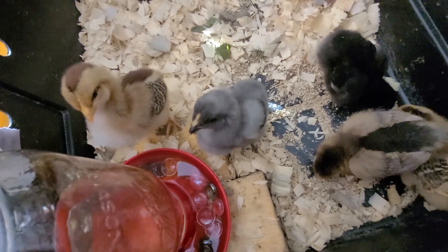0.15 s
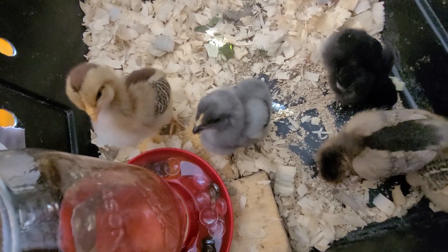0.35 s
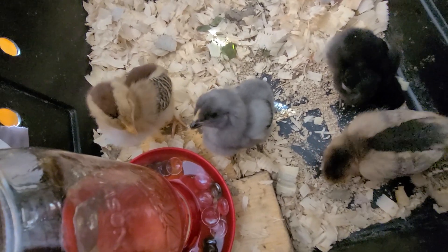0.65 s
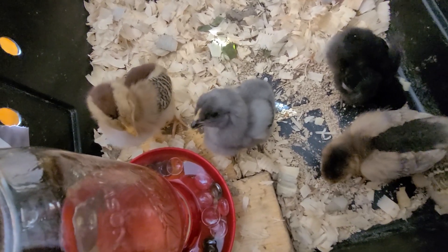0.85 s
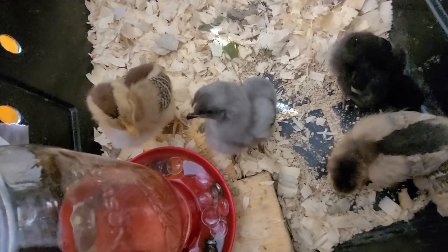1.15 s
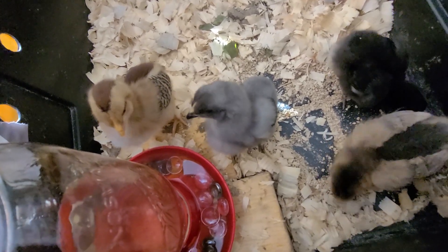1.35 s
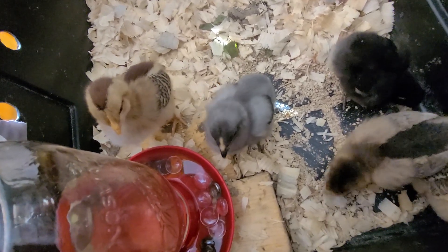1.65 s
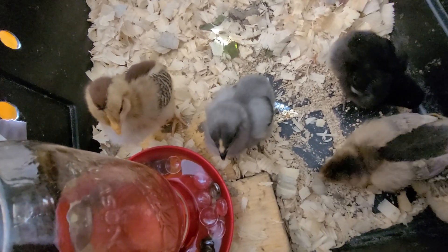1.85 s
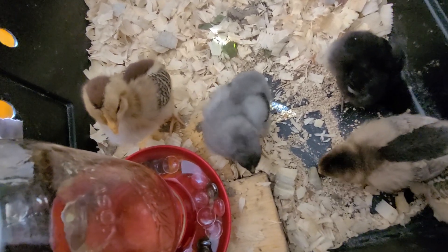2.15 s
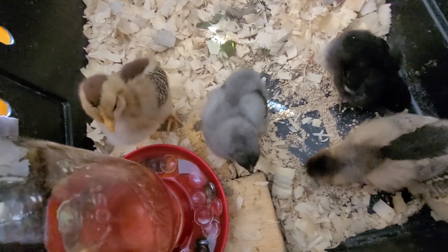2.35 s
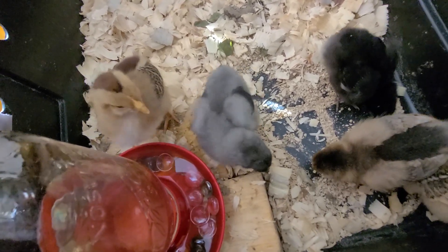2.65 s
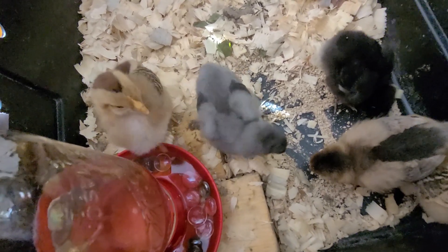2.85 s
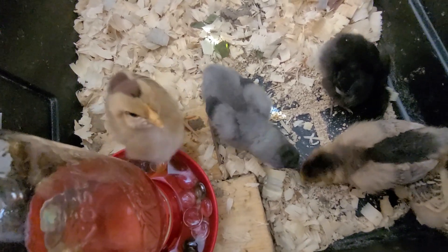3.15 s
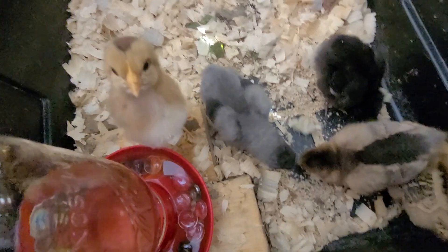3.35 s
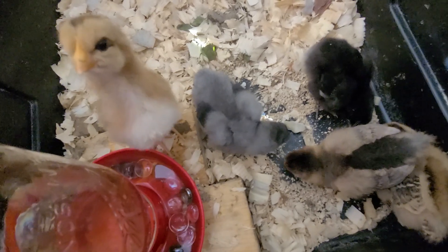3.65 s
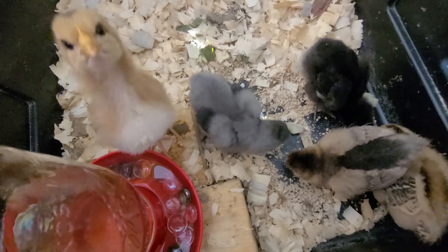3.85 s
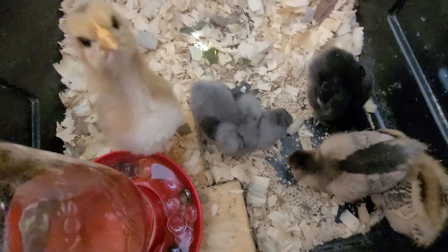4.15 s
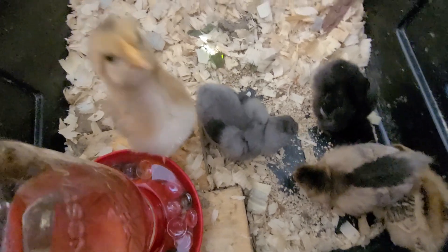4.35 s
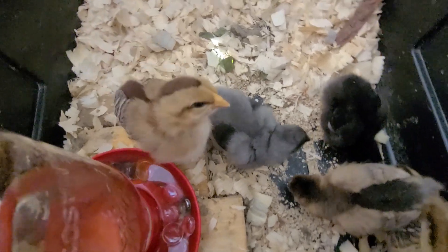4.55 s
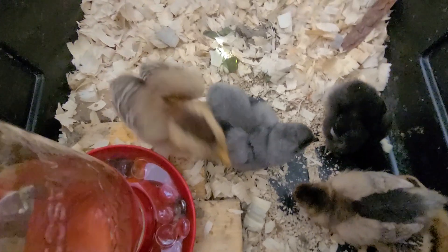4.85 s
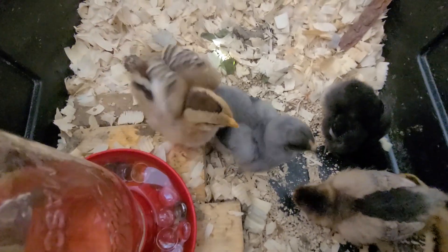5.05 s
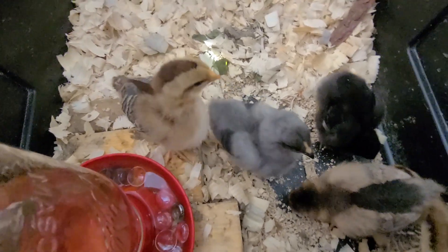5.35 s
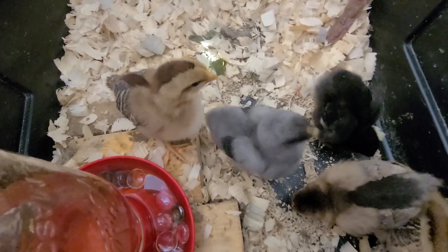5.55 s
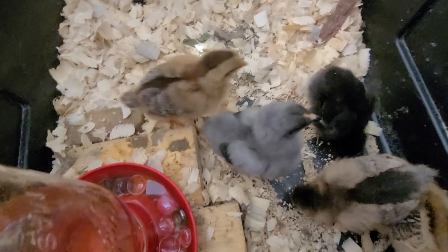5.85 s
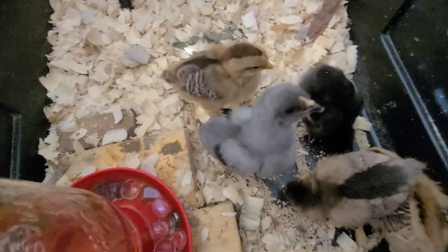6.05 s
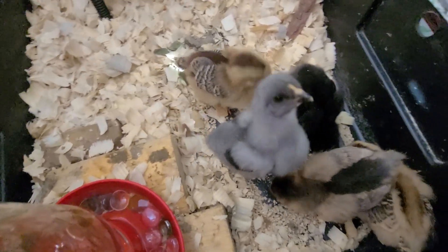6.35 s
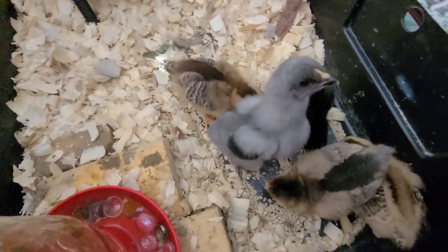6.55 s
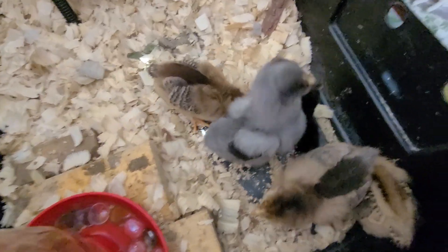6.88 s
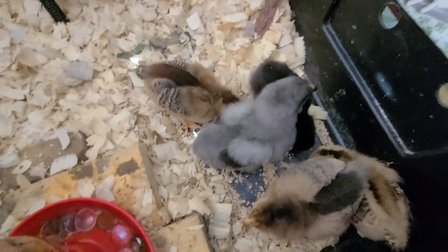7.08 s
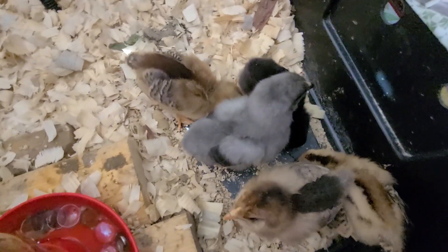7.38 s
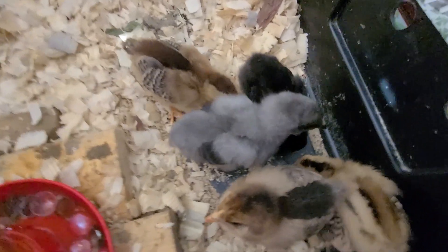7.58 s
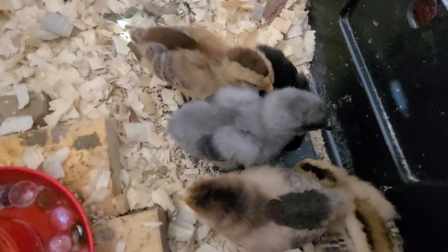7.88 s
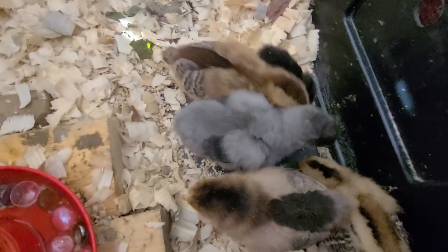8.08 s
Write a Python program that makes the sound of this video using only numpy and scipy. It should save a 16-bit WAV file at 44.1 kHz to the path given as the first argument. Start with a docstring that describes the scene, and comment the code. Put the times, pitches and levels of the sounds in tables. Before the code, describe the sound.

Chicks peep and peck close by in a plastic bin, over a faint room hum. From the start, beaks tap unevenly on the floor with a short, slightly hollow ring, one knock standing out at 1 second. Short, high, rising peeps are scattered through the first 3 seconds. Dry wood shavings rustle and snap underfoot, busiest from 2.5 to 3.5 seconds, with soft low thuds of steps. Three quick falling peeps come around 3.5 seconds, then a few rising ones and sharper knocks near 3.9 and 4.3 seconds. A rustle and soft thud follow at 5 seconds, and the peeps grow sparse and faint. A strong knock lands at 6.3 seconds amid more scratching. From 7 to 8 seconds comes a run of the loudest pecks, with three higher, stronger rising peeps and a softer one just after.

```python
"""Chicks peep and peck for food in a plastic bin indoors.
Each peep is a short whistle from the bird's voice organ, the syrinx, sweeping up or sliding down.
Beaks knock on the bin floor, make it ring and toss crumbs; heavy steps thud through the bin.
Feet, wings and pecks rustle and snap the wood shavings. Behind it all, the room hums faintly."""
import sys
import numpy as np
from scipy import signal
from scipy.fft import rfft, irfft
from scipy.io import wavfile

SR = 44100
rng = np.random.default_rng(int(sys.argv[2]) if len(sys.argv) > 2 else 0)


def output_pcm(signal):
    """Save a mono or channel-first signal as 16-bit PCM at the path in sys.argv[1].

    Samples are clipped to [-1, 1] before scaling.
    """
    pcm = np.clip(np.atleast_2d(signal).T, -1, 1) * 32767
    wavfile.write(sys.argv[1], SR, np.round(pcm).astype(np.int16))


N = 362502

# Beak blows on the floor: start_s, level_db, hardness_db_per_octave, crack_db, hollow_ring_db
PECKS = [(0.0505, -25.5, 6.5, -41.5, 12.5), (0.0942, -19, 7, -39.5, 4), (0.3725, -18.5, 7.5, -46, -2.5),
         (0.515, -20, 22.5, -39, 5), (0.6141, -14, 7, -39.5, 0), (0.9857, -9, 5, -50, 0),
         (1.1675, -22, 5.5, -31.5, 11), (1.6191, -22, 1.5, -55, 15), (1.634, -20.5, 5, -40.5, 8.5),
         (1.8561, -24, -0.5, -37, 7.5), (2.0754, -23, 7, -38.5, -4), (2.284, -35, 23, -60, 10),
         (2.416, -24.5, 9, -56, 9), (2.4603, -23, -0.5, -48, 3), (2.4904, -20.5, 12, -31.5, -5),
         (3.146, -32.5, 20, -52, -2), (3.2455, -21.5, 1.5, -38, 3.5), (3.875, -9, 3.5, -38.5, -7.5),
         (4.2815, -14, 4.5, -40.5, -14), (4.539, -31, 34, -34, -6), (4.6966, -38.5, 18, -62, 11),
         (4.7749, -40, 10, -46.5, 4), (5.566, -29, -7, -38, 0), (5.769, -20.5, 4.5, -37, 5.5),
         (6.018, -26.5, 0, -39, 8), (6.1137, -24, -12, -41.5, -6), (6.2268, -31, 16, -55, -10),
         (6.2625, -6.5, 4.5, -32, -1.5), (6.4514, -22, 1.5, -40, -7), (6.4965, -33, 26, -55, 0),
         (6.6202, -20.5, -5, -61, -1), (6.6354, -25, 8.5, -48, 2.5), (6.991, -2, 4.5, -37.5, -0.5),
         (7.25, -4.5, 2.5, -32, -0.5), (7.2785, -3, 1.5, -34.5, 0), (7.5234, -5, 3.5, -31, -1),
         (7.5895, -3.5, 3, -33.5, -0.5), (7.745, -15.5, 11.5, -36.5, -0.5), (7.754, -18.5, 9.5, -48, 5),
         (7.9075, -5, 3, -32.5, 3)]
PEEP_TAIL_S = 0.035  # time for a peep to close and its echoes to die


def gain_of(db):
    """Turns decibels into a number to multiply by."""
    return 10 ** (np.asarray(db) / 20)


def unit_power(x):
    """Scales a signal to an average power of 1."""
    return x / np.sqrt(np.mean(x ** 2) + 1e-20)


def curve_at(points, hz):
    """Reads between (frequency, value) points along straight lines on a log frequency scale."""
    point_hz, values = np.transpose(points)
    return np.interp(np.log(hz + 1), np.log(point_hz + 1), values)


def add(mix, start_s, sound):
    """Mixes a sound in at the given time."""
    part = mix[:, max(round(start_s * SR), 0):][:, :sound.shape[1]]
    part += sound[:, :part.shape[1]]


def panned(pan_db):
    """Left and right gains; pan_db is how much louder the left side is."""
    return unit_power(gain_of([[pan_db / 2], [-pan_db / 2]]))


def wander(rate_hz, size):
    """A smooth random wobble, mostly slower than rate_hz."""
    hz = np.fft.rfftfreq(size, 1 / SR)
    return unit_power(irfft(rfft(rng.standard_normal(size)) / (1 + (hz / rate_hz) ** 4), size))


def glide(t, times, pitches):
    """Eases from each pitch to the next."""
    index = np.arange(len(times))
    leg = np.interp(t, np.maximum.accumulate(times), index)
    return np.interp(np.floor(leg) + np.sin(np.pi / 2 * (leg % 1)) ** 2, index, pitches)


def quickest_ring(gains):
    """The quickest response to a click that has these gains across frequency."""
    log_gains = np.log(np.maximum(np.concatenate([gains, gains[-2:0:-1]]), 1e-5))
    return np.fft.ifft(np.exp(np.conj(signal.hilbert(log_gains)))).real


def filtered(x, response):
    """Passes a sound through a ring or a set of echoes, keeping its length."""
    return signal.oaconvolve(x, response, axes=1)[:, :x.shape[1]]


def room_air(noise_db=-57, waver=0.32):
    """Low room noise with a wavering hum."""
    # Tone colour of the noise: frequency_hz, level_db
    colour = [(15, -35), (25, -5), (117, -1), (161, -3), (217, -1), (451, -13), (607, -12), (1190, -18),
              (1610, -28), (3160, -27), (5280, -35), (6740, -29), (8830, -52), (12200, -41), (16000, -46)]
    # Tones in the hum: pitch_hz, level_db
    hum_tones = [(54, -66.5), (120, -68.5), (206, -63.5)]
    # How alike left and right are: frequency_hz, likeness (0 to 1)
    side_likeness = [(30, 0.61), (150, 1), (500, 0.82), (1200, 0.057), (3000, 0.08), (16000, 0.091)]
    hz, t = np.fft.rfftfreq(N, 1 / SR), np.arange(N) / SR
    left, unrelated = rfft(rng.standard_normal((2, N)))
    likeness = np.clip(curve_at(side_likeness, hz), -1, 1)
    right = likeness * left + np.sqrt(1 - likeness ** 2) * unrelated
    noise = irfft(np.array([left, right]) * gain_of(curve_at(colour, hz)), N)
    hum = np.zeros(N)
    for pitch_hz, level_db in hum_tones:
        wobble = 1 + waver * (wander(9.9, N) + 1j * wander(3.6, N))  # in loudness and phase
        hum += gain_of(level_db) * np.sqrt(2) * (wobble * np.exp(2j * np.pi * pitch_hz * t)).real
    return (gain_of(noise_db) * unit_power(noise) + hum) * panned(-1.6)


def room_echo(x, build_s=0.0036):
    """The room's soft wash of echoes, each frequency band dying at its own speed."""
    # Time the room takes to fade by 60 dB: frequency_hz, fade_s
    fade_times = [(150, 0.34), (500, 0.19), (1200, 0.2), (3000, 0.23), (8000, 0.27), (16000, 0.052)]
    hz, t, bands = signal.stft(rng.standard_normal((2, SR // 2)), SR, nperseg=256)
    fade = gain_of(-60 * t / curve_at(fade_times, hz)[:, None])
    tail = signal.istft(bands * fade * np.minimum(t / build_s, 1), SR, nperseg=256)[1]
    return filtered(x, tail / np.linalg.norm(tail[0]))


def wall_echoes(echo_db, fade_s, count=14):
    """The direct sound and its first bounces off the bin's walls, different left and right."""
    response = np.zeros((2, 1024))
    delays = rng.integers(30, 800, (2, count))  # in samples
    echoes = rng.choice([-1., 1.], delays.shape) * np.exp(-delays / SR / fade_s)
    echoes /= np.linalg.norm(echoes, axis=1, keepdims=True)
    np.put_along_axis(response, delays, gain_of(echo_db) * echoes, 1)
    response[:, 0] = 1
    return response / np.linalg.norm(response[0])


def floor_ring(hardness, hollow_db=0, spot_db=0, spot_shift=0, left_lag_s=0.00017):
    """The bin floor rings after a blow: harder contact lifts its high tones; each spot favours its own."""
    # The floor's natural tones: pitch_hz, width_hz, level_db, left_extra_db
    floor_tones = [(196.3, 47.4, -3, -5), (369.7, 53, 1, 0.5), (397.6, 59, 1, -5), (560.7, 84, 3.5, -2.5),
                   (631.4, 126, 3, -9.5), (734.4, 78, -1, -5.5), (833, 138, -7.5, -4), (985, 86, -13.5, -3),
                   (1161, 246, -11, -7.5), (1376, 160, -19.5, -26.5), (1860, 214, -25, 1),
                   (2130, 300, -21, -28)]
    lowest_hz, contact_hz, hollow_hz, hollow_width_hz = 190, 1090, 567, 107
    hz = np.fft.rfftfreq(8192, 1 / SR)
    blow = gain_of(hardness * np.log2(np.clip(hz, 340, 1900) / 600))
    blow /= np.sqrt(1 + (hz / contact_hz) ** 8)
    blow *= hz ** 2 / (hz ** 2 + lowest_hz ** 2)
    # a blow near the middle of the floor sounds hollow
    blow *= gain_of(hollow_db / (1 + (2 * (hz - hollow_hz) / hollow_width_hz) ** 2))
    spot = rng.uniform(-1, 1, (len(floor_tones), 2))
    power = np.zeros((2, len(hz)))
    for (pitch_hz, width_hz, level_db, left_db), (louder, higher) in zip(floor_tones, spot):
        height = gain_of([[level_db + left_db], [level_db]]) * gain_of(spot_db * louder)
        centre_hz = pitch_hz * (1 + spot_shift * higher)
        power += (height / (1 + (2 * (hz - centre_hz) / width_hz) ** 2)) ** 2
    ring = np.array([-quickest_ring(np.sqrt(side) * blow) for side in power])
    ring[0] = irfft(rfft(ring[0]) * np.exp(-2j * np.pi * hz * left_lag_s))
    return ring / abs(ring[1]).max()


def thuds(sway_hz=72, flex_hz=125, fade_s=0.017, peck_offset_db=-43.5):
    """A chick's weight, and less so a peck, sets the bin's lowest tones going."""
    # Heavy steps: start_s, peak_db
    heavy_steps = [(2.464, -45), (3.263, -42), (3.329, -51), (5.061, -45.5)]
    out, t = np.zeros((2, N)), np.arange(6000) / SR
    tones = np.sin(2 * np.pi * sway_hz * t) + np.sin(2 * np.pi * flex_hz * t)
    thud = t / fade_s * np.exp(-t / fade_s) * tones
    peck_thuds = [(start_s, db + peck_offset_db) for start_s, db, *_ in PECKS]
    for start_s, peak_db in heavy_steps + peck_thuds:
        add(out, start_s, gain_of(peak_db) * thud[None] / abs(thud).max())
    return out


def woody(x, brightness=0):
    """Makes clicks sound like dry wood; thinner chips are brighter (in dB per octave above 2 kHz)."""
    # Tone colour of dry shavings: frequency_hz, level_db
    colour = [(100, -21.5), (500, 3.5), (1200, -4.5), (1700, -0.5), (3500, 2), (5000, -1.5), (6700, 2.5),
              (7800, -4), (9000, -12.5), (11000, -7.5), (13000, -5.5), (16000, -11.5)]
    hz = np.fft.rfftfreq(512, 1 / SR)
    treble_db = brightness * np.log2(np.maximum(hz, 2000) / 2000)
    response = quickest_ring(gain_of(curve_at(colour, hz) + treble_db))
    return filtered(x, response[None] / np.linalg.norm(response))


def crack(fade_s, brightness):
    """A tiny brittle burst that builds as a chip bends, with its echoes."""
    age = np.arange(2048) / SR / fade_s
    burst = rng.laplace(size=(2, len(age))) * age ** 2 * np.exp(-age)
    burst = woody(filtered(burst, wall_echoes(echo_db=-4.5, fade_s=0.0077)), brightness)
    return burst / abs(burst).max(1, keepdims=True)


def clicks(per_s):
    """Scattered clicks of uneven size, a few of them large."""
    return unit_power(rng.laplace(size=(2, N)) * (rng.random(N) < per_s / SR))


def feet_side(time_s):
    """Left and right gains of the scratching at this moment."""
    # Where the busiest feet are: time_s, pan_db
    feet_path = [(0.6, -2), (2.8, -2), (3.3, 0), (4.3, 6), (5.2, 0), (6.5, -2), (7.7, -3)]
    return panned(np.interp(time_s, *np.transpose(feet_path)))


def rustle(rise_s=0.0029, clump_db=4, idle_db=-80, fidget_db=2.5, idle_scrape_db=-66):
    """Stirred shavings crackle in clumps while claws scrape the floor."""
    # Rustles from feet, wings and heavy pecks: start_s, hold_s, settle_s, level_db, scrape_offset_db
    stirs = [(0.622, 0.092, .006, -54.5, -1.5), (0.723, 0.064, .006, -62, -10),
             (1.385, 0.0056, 0.03, -46, -4), (1.939, 0.024, 0.0097, -57, 1),
             (2.451, 0.041, 0.0038, -52, 10.5), (2.581, 0.15, 0.012, -57, 0),
             (2.754, 0.085, .006, -55.5, -0.5), (2.879, 0.14, 0.0035, -60.5, -1.5),
             (3.165, 0.046, .006, -60.5, -10), (3.267, 0.054, .006, -59.5, 5),
             (3.316, 0.068, 0.046, -50.5, 8), (4.02, 0.016, 0.0039, -57, 10),
             (4.123, 0.026, .006, -58.5, 5), (4.385, .15, .006, -70, -16), (5.044, 0.0091, 0.047, -47, -10),
             (5.424, 0.037, .04, -61, 12), (5.972, 0.062, 0.032, -49, 4), (6.1, 0.18, 0.048, -61, 3.5),
             (6.506, 0.13, 0.089, -65, 12.5), (7.289, 0.0088, 0.053, -57, 14),
             (7.581, .02, 0.14, -60.5, 8.5)]
    peck_stirs = [(start_s, 0, 0.04, db - 64, 10) for start_s, db, *_ in PECKS]  # same columns
    chips, claws = np.zeros((2, N)), np.zeros((1, N))
    for start_s, hold_s, settle_s, level_db, scrape_db in stirs + peck_stirs:
        t = np.arange(-2 * rise_s, hold_s + 5 * settle_s, 1 / SR)
        rise, settle = np.minimum(t / rise_s - 1, 0), np.maximum(t - hold_s, 0) / settle_s
        push = gain_of(level_db) * np.exp(rise - settle)
        add(chips, start_s + t[0], push * feet_side(start_s))
        add(claws, start_s + t[0], push[None] * gain_of(scrape_db))
    chips += gain_of(idle_db + fidget_db * wander(25, N))  # the chicks never stand quite still
    clumps = gain_of(clump_db * wander(50, N))
    scrape = claws[0] * clumps * clicks(per_s=1000)[0] + gain_of(idle_scrape_db) * clicks(per_s=40)[0]
    ring = floor_ring(hardness=18.5)
    crackle = filtered(chips * clumps * clicks(per_s=7000), wall_echoes(echo_db=-7, fade_s=0.006))
    return woody(crackle) + filtered(np.array([scrape, scrape]), ring / np.linalg.norm(ring[1]))


def snaps(boost_db=2):
    """Single shavings break or flick against each other."""
    # The loudest snaps: start_s, level_db, brightness_db_per_octave
    breaks = [(0.631, -36, 1), (0.6486, -35.5, 2.5), (1.5086, -39.5, 1), (1.6716, -34.5, -0.5),
              (2.4564, -33, 1), (2.489, -28.5, 4.5), (2.6942, -33.5, 1), (3.5542, -39.5, 2.5),
              (3.6197, -35, 8), (4.034, -37.5, -0.5), (4.139, -38, 4), (4.226, -43, -2.5),
              (4.264, -47, 0.5), (4.436, -51, 1), (4.5383, -40, -7), (5.3717, -47.5, 3.5), (6.23, -41, 3),
              (4.9823, -44.5, 3), (5.227, -40, -0.5), (6.169, -42, 1.5), (6.544, -40.5, 1),
              (7.703, -39.5, 0.5), (7.989, -48, -3.5)]
    out = np.zeros((2, N))
    for start_s, level_db, brightness in breaks:
        snap = crack(fade_s=0.001, brightness=brightness)
        add(out, start_s, gain_of(level_db + boost_db) * feet_side(start_s) * snap)
    return out


def pecks(touch_db=-27, touch_lead_s=0.002543, crumbs_db=-54, land_s=0.017, spread_s=0.011):
    """Each peck lightly touches the floor, knocks and rings it, cracks a shaving and scatters crumbs."""
    out, t = np.zeros((2, N)), np.arange(3000) / SR
    for start_s, level_db, hardness, crack_db, hollow_db in PECKS:
        knock = floor_ring(hardness, hollow_db, spot_db=3, spot_shift=0.015)
        add(out, start_s, gain_of(level_db) * knock)
        touch_s = start_s - touch_lead_s * rng.uniform(0.49, 2.12)
        add(out, touch_s, gain_of(0.4 * level_db + touch_db) * floor_ring(hardness + 3))
        add(out, start_s, gain_of(crack_db) * crack(fade_s=0.0012, brightness=-7))
        crumbs = rng.laplace(size=(2, len(t))) * np.exp(-((t - land_s) / spread_s) ** 2 / 2)
        add(out, start_s, gain_of(level_db + crumbs_db) * woody(crumbs, brightness=-9.5))
    return out


def whistle(t, hz, breath_db, level_db, pan_db, overtone_db, jitter=0.0078, left_lead_s=0.00009):
    """A nearly pure tone from the syrinx, with its overtones and echoes off the bin's walls."""
    # How the throat and open beak favour the overtone: frequency_hz, gain_db
    throat = [(5200, -14.5), (5800, 4), (6400, 2.5), (7100, -3.5), (7800, -16), (9000, -36)]
    beak_hz, beak_width_hz, beak_db = 3200, 320, 5
    cycles = np.cumsum(hz * (1 + jitter * wander(500, len(t)))) / SR
    phase = 2 * np.pi * (cycles + hz * np.array([[left_lead_s], [0]]))
    effort = gain_of(breath_db)
    # overtones grow faster with effort than the main tone does
    overtone_gain = np.sqrt(effort) * gain_of(overtone_db + curve_at(throat, 2 * hz))
    overtones = overtone_gain * (np.sin(2 * phase) + gain_of(-36.5) * np.sin(3 * phase))
    # throat and beak resonate, so the tone swells as it passes beak_hz
    beak_gain = gain_of(beak_db / (1 + (2 * (hz - beak_hz) / beak_width_hz) ** 2) - beak_db)
    voice = effort * (beak_gain * np.sin(phase) + overtones)
    tone = filtered(voice, wall_echoes(echo_db=-4, fade_s=0.0084))
    power = np.mean(tone[:, t < t[-1] - PEEP_TAIL_S] ** 2, axis=1, keepdims=True)
    return gain_of(level_db) * panned(pan_db) * tone / np.sqrt(power)


def falling_peeps(rest_hz=2677, release_db_per_s=1500):
    """Short peeps that swell and fade as they slide down to one resting pitch."""
    # Falling calls: start_s, length_s, start_hz, level_db, pan_db
    calls = [(3.418, .032, 3480, -31, 4.5), (3.556, 0.026, 3660, -32, 3), (3.726, 0.023, 3540, -37, 3),
             (5.693, 0.028, 3070, -49.5, 2), (6.582, 0.038, 3190, -47.5, 0), (6.805, 0.037, 3220, -47, 1)]
    out = np.zeros((2, N))
    for start_s, length_s, start_hz, level_db, pan_db in calls:
        t = np.arange(0, length_s + PEEP_TAIL_S, 1 / SR)
        progress = np.minimum(t / length_s, 1)
        hz = rest_hz + (start_hz - rest_hz) * (1 - np.sin(np.pi / 2 * progress ** 1.4))
        breath_db = np.interp(progress, [0, 0.52, 1], [-19, 0, -5])
        breath_db -= release_db_per_s * np.maximum(t - length_s, 0)
        overtone_db = 23.5 + 1.5 * level_db  # louder peeps are brighter
        add(out, start_s, whistle(t, hz, breath_db, level_db, pan_db, overtone_db))
    return out


def rising_peeps(open_s=0.0048, turn_s=0.00915, close_s=0.013, sag_hz_per_s=6500, sweep_hz_per_s=58000):
    """The pitch sags, sweeps up to a top note and hooks down as the syrinx closes."""
    # Rising calls: start_s, time_to_top_s, low_hz, top_hz, level_db, pan_db, overtone_db
    calls = [(0.134, .041, 3060, 4080, -37.5, 2, -43), (0.313, 0.032, 3306, 3920, -38, -5, -37),
             (0.731, 0.058, 2536, 3750, -34.5, -6, -33), (0.939, 0.056, 2977, 4040, -39.5, -8, -33.5),
             (0.981, .039, 3060, 3890, -41, -3, -40), (1.548, .056, 2730, 3840, -31, -6, -25),
             (1.796, .058, 3065, 3700, -39.5, -3, -13.5), (2.183, 0.041, 3084, 3750, -39, -5, -20.5),
             (2.767, 0.062, 2824, 4030, -35, -5, -25), (3.893, 0.032, 2895, 3330, -37, 0, -37),
             (4.113, 0.037, 2810, 3520, -37.5, 0.5, -42), (4.423, 0.023, 2890, 3540, -49.5, 5, -15),
             (6.186, 0.033, 2860, 3460, -42.5, 3, -51), (7.352, .06, 2794, 4480, -31, -7, -33),
             (7.506, 0.047, 3183, 4455, -30, -6, -33), (7.722, 0.061, 3364, 4560, -34, -3, -28),
             (8.212, 0.027, 3300, 3790, -40.5, -13, -32)]
    # Strength of the breath: onset_db, open_db, strongest_db, top_db, closing_db
    breath_stages = [-21, -4, 5.5, -10, -19]
    out = np.zeros((2, N))
    for start_s, top_s, low_hz, top_hz, level_db, pan_db, overtone_db in calls:
        t = np.arange(0, top_s + PEEP_TAIL_S, 1 / SR)
        span_hz = top_hz - low_hz
        sweep_s = turn_s + span_hz / sweep_hz_per_s
        sag_s = max(top_s - sweep_s, open_s)
        pitches = [low_hz + sag_hz_per_s * sag_s, low_hz, top_hz, top_hz - 0.5 * span_hz]
        hz = glide(t, [0, sag_s, top_s, top_s + close_s], pitches)
        stage_times = [0, open_s, sag_s + 0.28 * sweep_s, top_s, top_s + close_s, t[-1]]
        breath_db = np.interp(t, np.maximum.accumulate(stage_times), [*breath_stages, -110])
        add(out, start_s, whistle(t, hz, breath_db, level_db, pan_db, overtone_db))
    return out


def scene():
    """Voices, pecks, litter and thuds in the bin, with the room's echo and air."""
    voices = rising_peeps() + falling_peeps()
    knocks = pecks()
    litter = rustle() + snaps()
    echo = room_echo(gain_of(-21.5) * voices + gain_of(-16.5) * knocks + gain_of(-15) * litter)
    return voices + knocks + litter + thuds() + echo + room_air()


def record(dry):
    """Cuts the highest treble, above about 16 kHz."""
    low_pass = signal.firwin(511, 15950, window=("kaiser", 9), fs=SR)
    return signal.oaconvolve(dry, low_pass[None], "same")


dry = scene()
out = record(dry)
output_pcm(out)
```